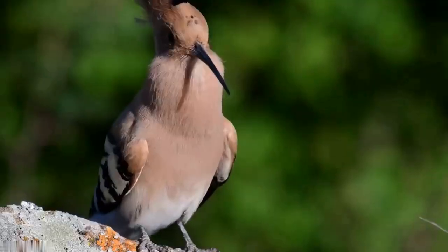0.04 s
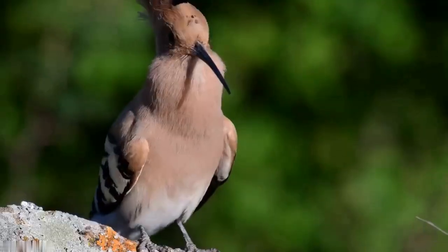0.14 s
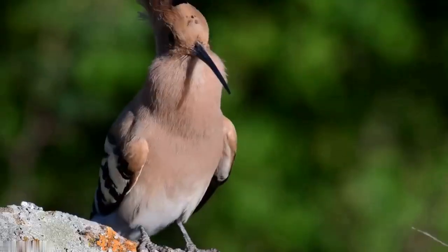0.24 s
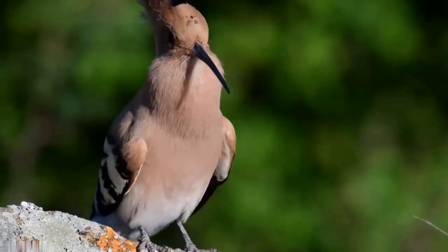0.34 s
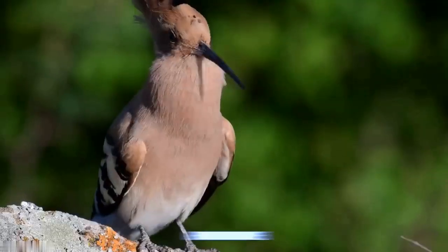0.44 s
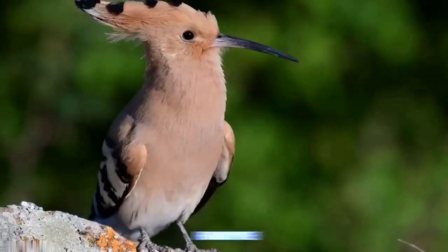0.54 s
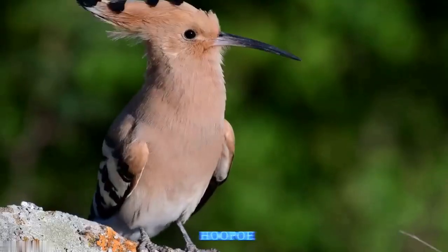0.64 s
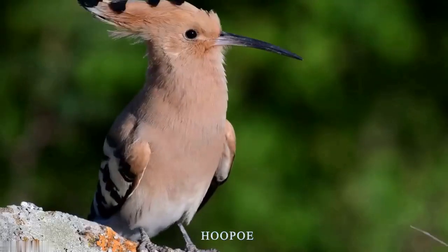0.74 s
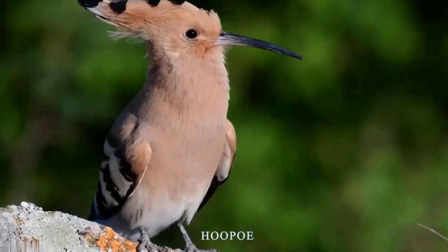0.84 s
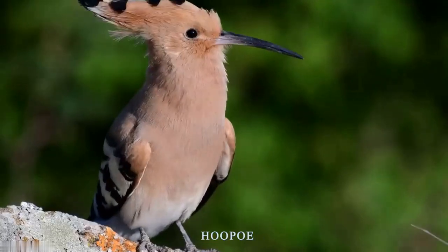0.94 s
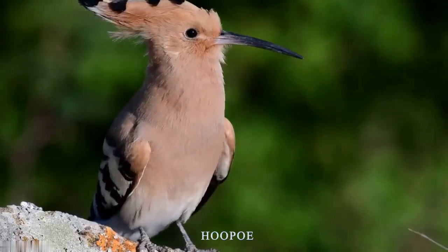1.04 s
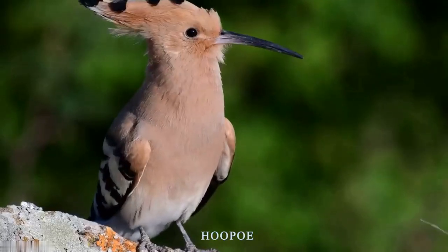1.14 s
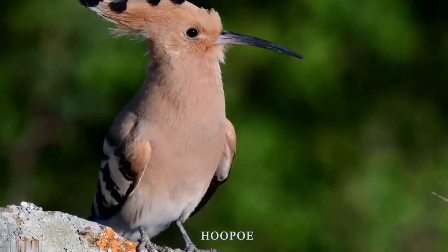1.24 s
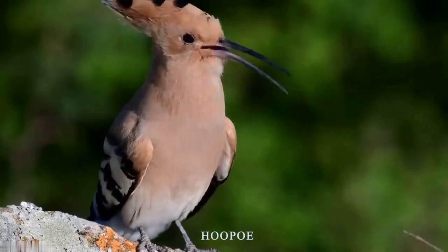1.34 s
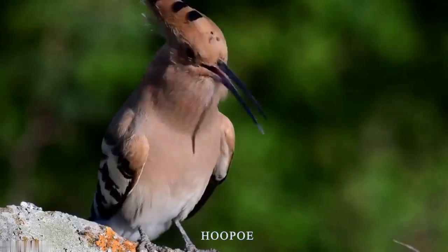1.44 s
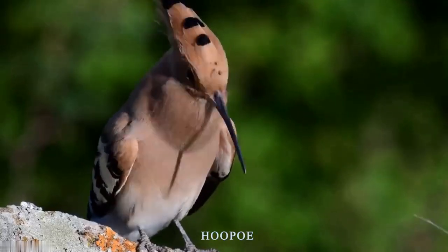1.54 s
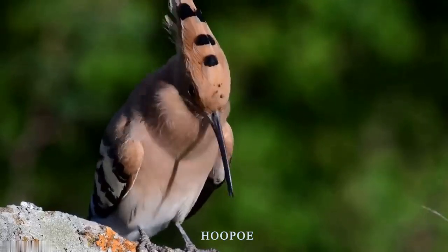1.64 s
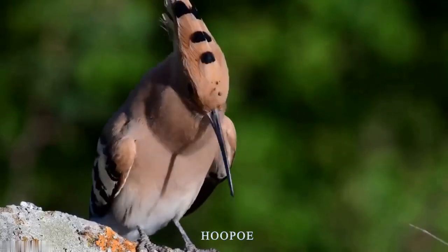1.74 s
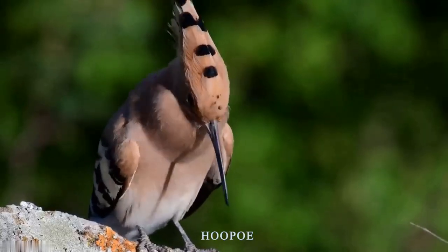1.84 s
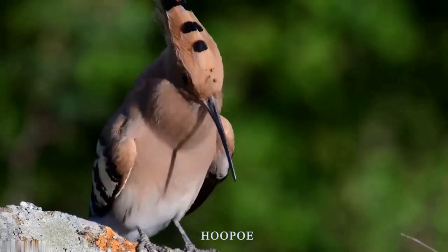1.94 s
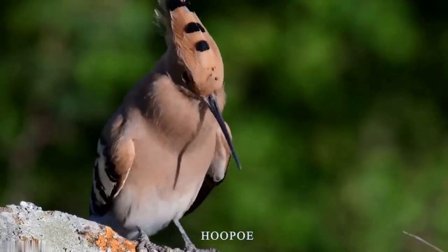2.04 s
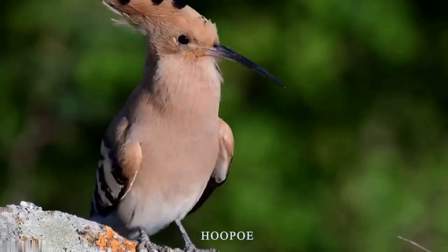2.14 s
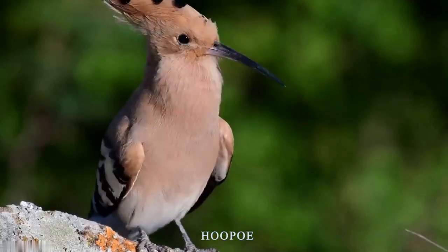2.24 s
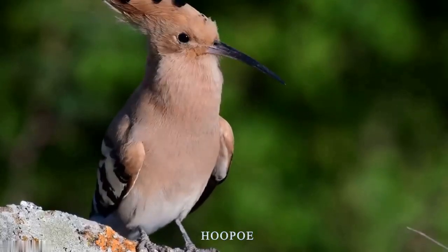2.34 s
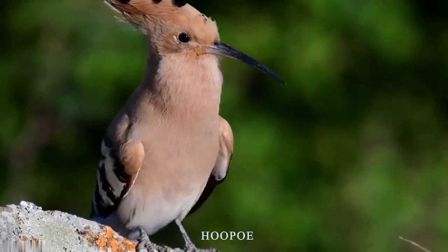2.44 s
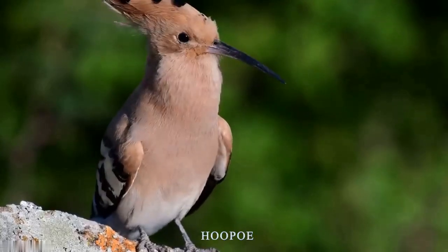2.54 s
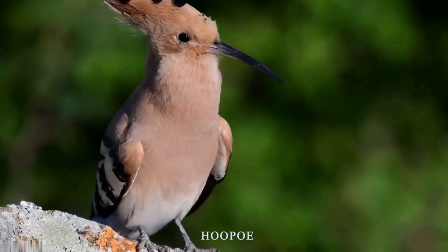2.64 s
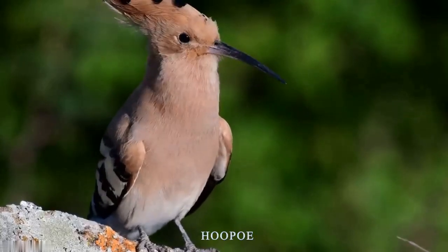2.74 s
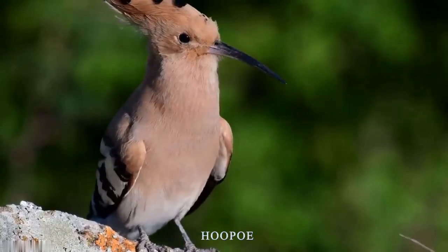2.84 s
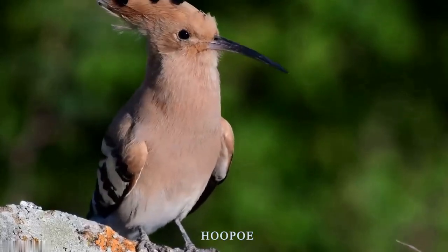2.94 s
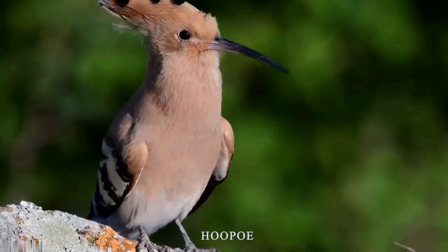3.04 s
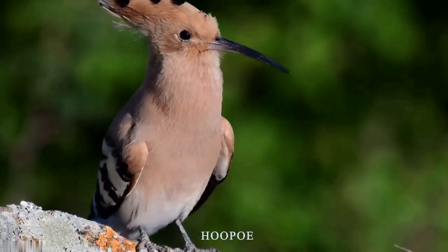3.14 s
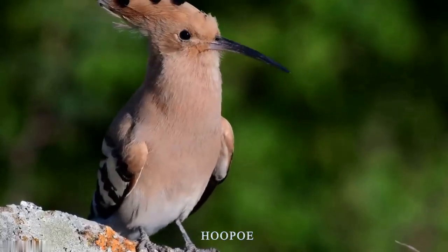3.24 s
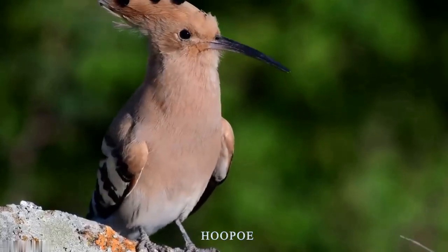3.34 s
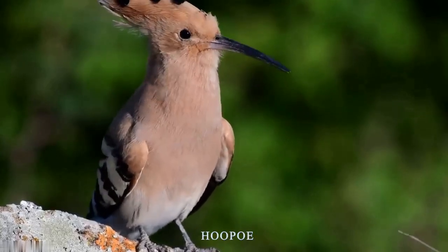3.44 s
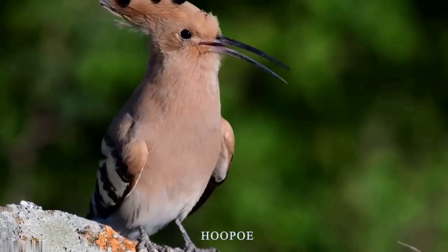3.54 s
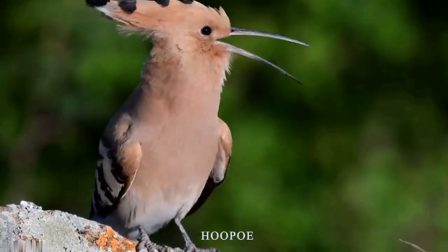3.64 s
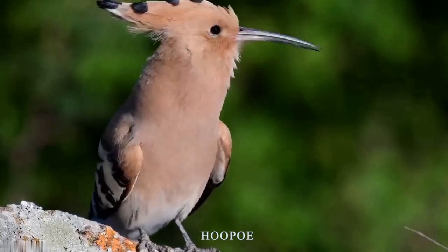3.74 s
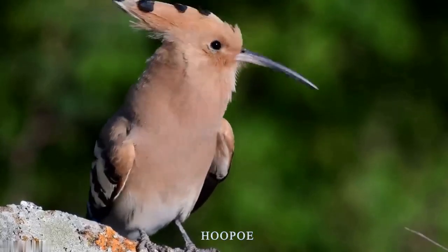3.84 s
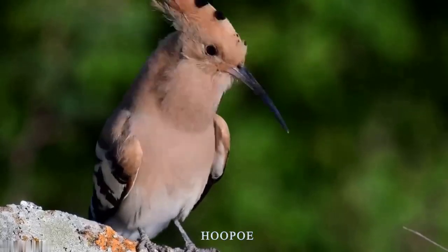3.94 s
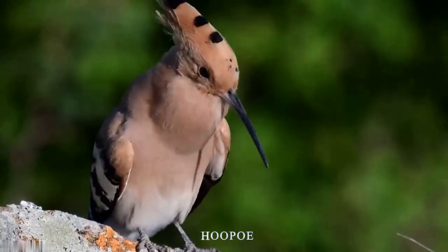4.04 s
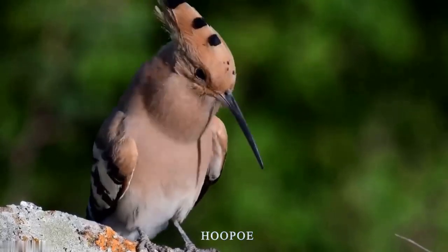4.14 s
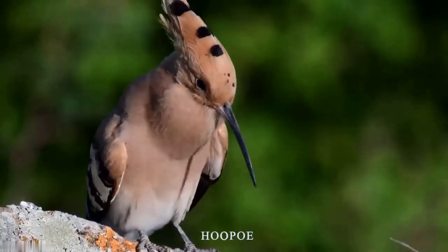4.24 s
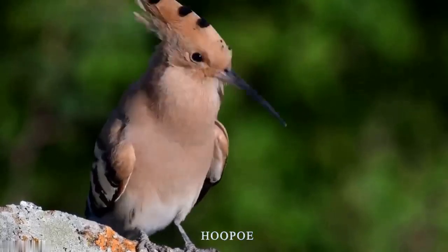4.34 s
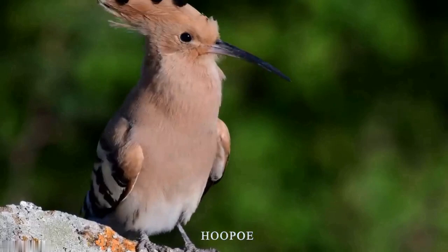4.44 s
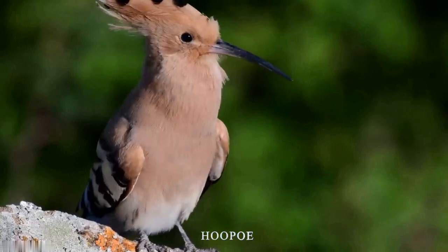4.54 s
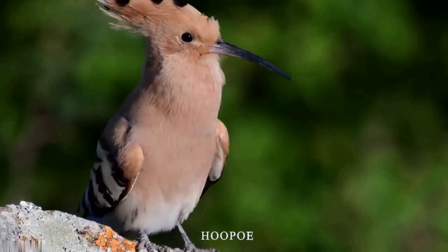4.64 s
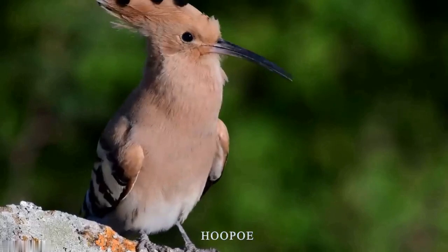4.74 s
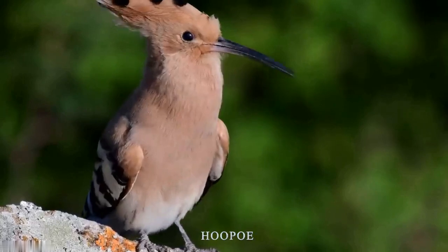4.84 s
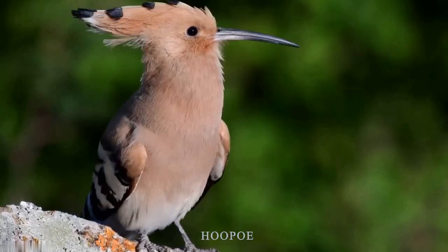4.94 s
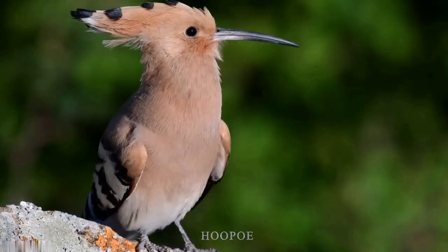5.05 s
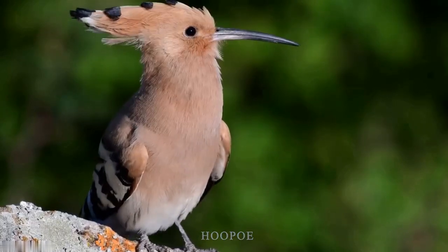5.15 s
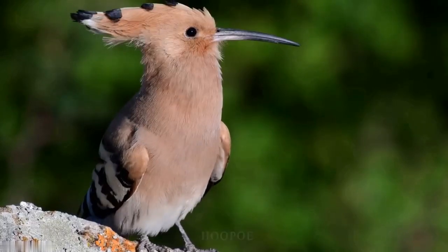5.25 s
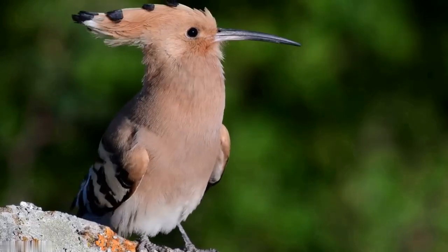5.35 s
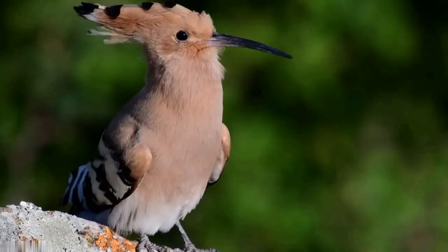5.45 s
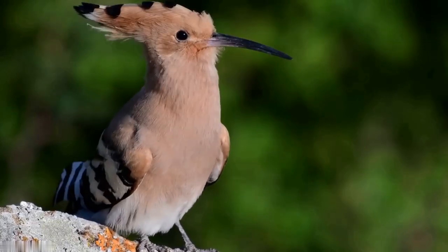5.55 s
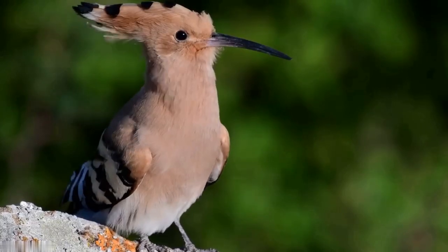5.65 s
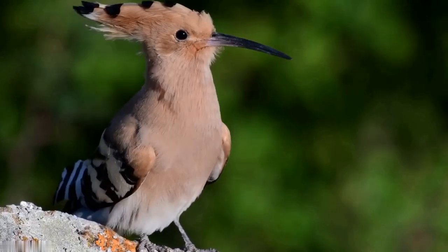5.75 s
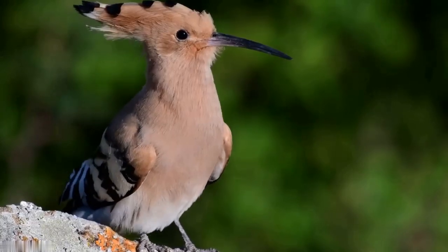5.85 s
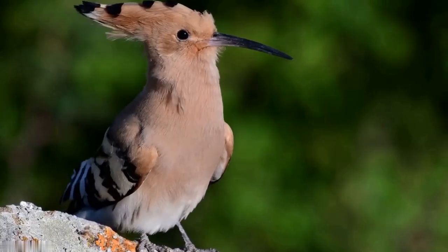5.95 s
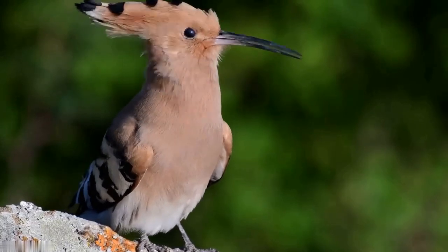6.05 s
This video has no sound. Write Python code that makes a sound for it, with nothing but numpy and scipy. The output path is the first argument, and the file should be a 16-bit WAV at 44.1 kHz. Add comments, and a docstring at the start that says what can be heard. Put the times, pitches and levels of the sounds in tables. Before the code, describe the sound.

Outdoors among rocks, grass and trees, the tail of one low hoot is followed by a pause, then a hoopoe's three even, pure, hollow notes. After another pause come three more, the first cracking briefly upward. Two crickets chirp thinly throughout, small birds tick and peep, and slight scuffs and rustles come before the second phrase. Wide stereo, leaning right, with little echo.

```python
"""Among rocks, grass and trees, a hoopoe hoots two soft phrases of three notes after the end of an earlier one.
Its notes are swelling near-sine tones with faint overtones; two crickets chirp in raspy wing strokes.
A small bird ticks in filtered noise, another peeps far away in arched whistles that flip upward.
Shaped noise makes rustles, swishes, scuffs and low bumps; the trees give a faint echo.
Under it lies a quiet, wide outdoor hush whose bass rises with one soft gust."""
import sys
import numpy as np
from scipy import signal
from scipy.fft import rfft, irfft
from scipy.io import wavfile
from scipy.ndimage import uniform_filter1d

SR = 44100
rng = np.random.default_rng(int(sys.argv[2]) if len(sys.argv) > 2 else 0)


def master_out(mix):
    """Clip the mix to full scale and print it as 16-bit PCM to the path in sys.argv[1]."""
    frames = np.transpose(np.atleast_2d(mix))
    ceiling = np.clip(frames, -1, 1)
    pcm = np.round(ceiling * 32767).astype(np.int16)
    wavfile.write(sys.argv[1], SR, pcm)


N = 268833


def amp(db):
    """Decibel law: 20 dB is a factor of ten in amplitude."""
    return 10 ** (np.asarray(db) / 20)


def unit(x):
    """Normalisation to a root-mean-square of 1."""
    return x / np.sqrt(np.mean(x ** 2) + 1e-20)


def read(points, hz):
    """Logarithmic frequency scale: joins (Hz, value) points along it."""
    f, value = np.transpose(points)
    return np.interp(np.log(hz + 1), np.log(f), value)


def add(mix, s, sound):
    """Superposition: adds a stereo sound, which may have begun before time zero."""
    start = round(s * SR)
    sound = sound[:, max(-start, 0):]
    part = mix[:, max(start, 0):][:, :sound.shape[1]]
    part += sound[:, :part.shape[1]]


def progress(length):
    """Normalised time: runs from 0 to 1 over length seconds."""
    return np.linspace(0, 1, max(round(length * SR), 16))


def wander(count, hz):
    """Low-pass noise: a smooth random drift of rms 1, no faster than about hz."""
    f = np.fft.rfftfreq(count + 4096, 1 / SR)
    spectrum = rfft(rng.standard_normal(count + 4096))
    return unit(irfft(spectrum * np.exp(-(f / hz) ** 2)))[:count]


def burst(length, colour):
    """Spectral shaping: noise of the given colour that swells and fades."""
    u = progress(length)
    spectrum = rfft(rng.standard_normal(16384))
    noise = irfft(spectrum * colour(np.fft.rfftfreq(16384, 1 / SR)))[:len(u)]
    return unit(noise) * np.sin(np.pi * u)


def hump(hz, width_hz):
    """Resonance: a broad peak with steep skirts."""
    return lambda f: 1 / (1 + ((f - hz) / width_hz) ** 4)


# Hoopoe notes; the fifth row's voice cracks into the two short tones after it.
# Each row: start in seconds, length in seconds, level in dB, then pitch in Hz early, in the middle, at the end.
HOOTS = [(-.1035, .113, -23, 650, 665, 670), (1.702, .111, -23.4, 672, 665, 637),
         (1.904, .113, -22.1, 661, 672, 669), (2.113, .113, -22.1, 648, 664, 679),
         (3.980, .081, -26.4, 668, 674, 692), (4.053, .015, -34, 790, 790, 765),
         (4.063, .021, -33.5, 735, 695, 625), (4.171, .115, -24, 649, 658, 640),
         (4.380, .112, -24.1, 644, 659, 658)]
# Overtones that leak past the swollen throat.
# Each row: multiple of the pitch, level in dB before the boost at closing.
OVERTONES = [(2, -40.5), (3, -51.5)]
# Slow swell and quick shut-off as shares of the note, the latter no faster than the syrinx can close.
HOOT_SWELL, HOOT_RELEASE, HOOT_SHUT_S = 0.37, 0.13, 0.0068


def hoot(s, length, db, early_hz, middle_hz, end_hz, scoop=.86, waver=0.002, closing_db=5, steepness=2.01):
    """Pressure-driven syrinx: an almost pure tone scoops up to pitch as the air pressure builds."""
    u = progress(length)
    hz = np.interp(u, [0, .25, .62, 1], [early_hz * scoop, early_hz, middle_hz, end_hz])
    wavering_hz = uniform_filter1d(hz, size=400) * (1 + waver * wander(len(u), 120))
    turns = np.cumsum(wavering_hz) / SR
    release = max(HOOT_RELEASE, HOOT_SHUT_S / length)
    opening = 1 - np.exp(-(u / HOOT_SWELL) ** steepness)
    closing = 1 - np.exp(-((1 - u) / release) ** 2)
    swell = opening * closing
    tone = swell * np.sin(2 * np.pi * turns)
    # overtones come up as soon as the syrinx vibrates, and are lifted as it closes
    edge = abs(swell) ** .5 * amp(closing_db * np.exp(-((u - .88) / 0.38) ** 2))
    for multiple, overtone_db in OVERTONES:
        level = amp(overtone_db + 1.9 * wander(len(u), 56)) * edge
        tone += level * np.sin(2 * np.pi * round(multiple) * turns)
    return s, amp(db) * tone


# Chirps of the near cricket.
# Each row: centre of the first wing stroke in seconds, level of a full stroke in dB.
NEAR_CHIRPS = [(.122, -52), (.411, -56), (.775, -49.5), (1.088, -56), (1.393, -54), (1.670, -53),
               (1.975, -55.5), (2.270, -52.5), (2.549, -49.5), (2.833, -49.5), (3.108, -46), (3.382, -46),
               (3.650, -52), (3.915, -48.5), (4.199, -52), (4.488, -57.5), (4.758, -56), (5.052, -46),
               (5.330, -48.5), (5.619, -48.5), (5.921, -49.5)]
# The gap from stroke to stroke grows within a chirp; the pitch falls by a share as the wing closes.
STROKE_GAP_S, GAP_GROWTH_S, STROKE_SAG = .027, .0045, .095
# The wings need a moment to reach full swing: full stroke length, then what the first stroke lacks
# (share of length, share of pitch, dB).
STROKE_S, FIRST_SHORTER, FIRST_LOWER, FIRST_SOFTER_DB = .029, 0.52, 0.021, 3.5


def cricket(chirps, hz, rasp, vary_db, grain_db, count=4, taper=1.1):
    """Stridulation: the scraper is dragged over the file, a short raspy tone that falls at its end."""
    for s, db in chirps:
        for k in range(count):
            lack = np.exp(-k)
            length = STROKE_S * (1 - FIRST_SHORTER * lack)
            u = progress(length)
            stroke_hz = hz * (1 - FIRST_LOWER * lack - STROKE_SAG * u ** 3)
            teeth_hz = stroke_hz * (1 + rasp * wander(len(u), 700))
            stroke_db = db - FIRST_SOFTER_DB * lack + vary_db * rng.standard_normal()
            swell = abs(np.sin(np.pi * u)) ** taper * amp(stroke_db)
            grip = amp(grain_db * wander(len(u), 370))
            yield s - length / 2, swell * grip * np.sin(2 * np.pi * np.cumsum(teeth_hz) / SR)
            s = s + STROKE_GAP_S + k * GAP_GROWTH_S


# Drifting loudness of the far cricket. Each row: time in seconds, level of a full stroke in dB.
FAR_LEVEL = [(.15, -61), (.5, -66.5), (2, -64.5), (3.1, -61.5), (3.9, -70.5), (4.9, -67), (5.3, -61)]
FAR_FIRST_S, FAR_PERIOD_S = -.063, .2518


def far_chirps(stray_s=0.0028):
    """Near-periodic rhythm: (s, dB) of the far cricket's chirps, each straying a little from the beat."""
    times = np.arange(FAR_FIRST_S, N / SR - FAR_PERIOD_S, FAR_PERIOD_S)
    strayed = times + stray_s * rng.standard_normal(len(times))
    return zip(strayed, np.interp(times, *np.transpose(FAR_LEVEL)))


# Dry ticks of a small bird.
# Each row: centre in seconds, length in seconds, level in dB, resonance in Hz.
TICKS = [(.683, 0.039, -63, 5040), (.881, 0.05, -57.5, 5400), (1.126, 0.019, -56.5, 5330),
         (1.891, 0.025, -55.5, 5886), (2.265, 0.029, -56, 5694), (3.611, 0.025, -53, 5400),
         (4.709, 0.022, -63, 5300), (5.040, 0.021, -55.5, 5080), (5.382, 0.036, -52.5, 5400)]
# Soft low bumps. Each row: centre in seconds, length in seconds, level in dB, resonance in Hz.
BUMPS = [(1.522, .024, -60.5, 300), (3.816, .016, -52.5, 150), (3.906, .022, -53.5, 160),
         (5.172, .03, -56, 335)]


def puffs(rows, width_hz, grain_db):
    """Resonance filtering: short grainy noises, each in one resonance."""
    for s, length, db, hz in rows:
        sound = burst(length, hump(hz, width_hz))
        grain = unit(amp(grain_db * wander(len(sound), width_hz / 2)))
        yield s - length / 2, amp(db) * sound * grain


# Peeps of a distant bird. Each row: start in seconds, level in dB.
PEEPS = [(.003, -49), (.664, -51.5), (1.382, -54), (2.522, -54.5), (3.606, -59.5), (5.478, -58.5)]
# Length, pitch at the top of the arch, share by which its ends lie lower.
PEEP_S, PEEP_HZ, PEEP_ARCH = .055, 1808, .1
# Past its middle the voice flips up: when, for how long, pitch ratio, level change.
FLIP_AT_S, FLIP_S, FLIP_RATIO, FLIP_DB = .033, .012, 1.2, -4


def peep(s, db, rough=0.011, vary=.008, hoarse_db=1.5):
    """Frequency modulation: a thin, slightly hoarse whistle arches and breaks upward for a moment."""
    u = progress(PEEP_S)
    flip = np.exp(-(2 * (u * PEEP_S - FLIP_AT_S) / FLIP_S) ** 8)
    hz = PEEP_HZ * (1 - PEEP_ARCH * (2 * u - 1) ** 2) * FLIP_RATIO ** flip
    level = amp(db + FLIP_DB * flip + hoarse_db * wander(len(u), 300))
    swell = level * abs(np.sin(np.pi * u)) ** .5
    pitch = hz * (1 + vary * rng.standard_normal() + rough * wander(len(u), 300))
    return s, swell * np.sin(2 * np.pi * np.cumsum(pitch) / SR)


# Scuffs and snaps close by. Each row: centre in seconds, length in seconds, level in dB.
SCUFFS = [(3.811, 0.004, -52.5), (3.895, 0.04, -59), (3.901, 0.015, -45), (4.876, 0.0076, -52.5)]
# Their spectrum. Each row: frequency in Hz, relative level in dB.
SCUFF_COLOUR = [(60, -4), (300, 9.5), (700, -5), (1050, -9), (1400, 3), (2200, -4.5), (4000, -5),
                (6800, 3.5), (8500, -13), (10500, -8.5), (13000, -25.5)]
# Dry rustles on the right. Each row: centre in seconds, length in seconds, level in dB.
RUSTLES = [(3.768, 0.028, -58), (3.793, 0.047, -63), (3.826, .018, -62), (3.973, .028, -67.5),
           (4.115, .05, -68), (4.21, 0.24, -75.5), (4.310, .022, -58.5), (4.352, .1, -65.5),
           (4.808, 0.031, -66.5)]
# Their spectrum. Each row: frequency in Hz, relative level in dB.
RUSTLE_COLOUR = [(900, -21.5), (1550, -11.5), (1850, 4), (2100, -2.5), (2450, -7.5), (3200, -15.5),
                 (4200, -17.5), (8000, -33)]
# Faint high swishes. Each row: centre in seconds, length in seconds, level in dB.
SWISHES = [(.145, 0.057, -62), (.26, .35, -72), (.46, 0.043, -68), (.515, 0.036, -66), (.81, 0.078, -65),
           (3.78, .089, -66.5), (3.925, 0.046, -65)]
# Their spectrum. Each row: frequency in Hz, relative level in dB.
SWISH_COLOUR = [(2000, -22.5), (4000, -9.5), (6000, -0.5), (9000, -3), (11000, -8), (14000, -32)]


def scrapes(rows, colour, grain_hz, grain_db):
    """Amplitude-modulated noise: brief, broad, grainy sounds of one colour."""
    for s, length, db in rows:
        sound = burst(length, lambda f: amp(read(colour, f)))
        grain = unit(amp(grain_db * wander(len(sound), grain_hz)))
        yield s - length / 2, amp(db) * sound * grain


# Decay of the diffuse echo. Each row: frequency in Hz, time to fall by 60 dB in seconds.
ECHO_T60 = [(300, 0.47), (700, 0.56), (2000, 0.98), (6000, 0.32), (12000, 0.13)]
# Single echoes from nearby trees. Each row: delay in seconds, level in dB against the diffuse echo.
REFLECTIONS = [(.043, -0.5), (.135, -12)]


def path(right_db, echo_db, scatter_db, scatter_s, lag_samples=0.):
    """Impulse response to two microphones: direct sound, scatter off ground and leaves, thin tree echoes."""
    size = 30000
    taps = rng.choice([-1., 1.], (2, size)) * (rng.random((2, size)) < 2000 / SR)  # about 2000 a second
    hz, t, z = signal.stft(taps, SR, nperseg=256)
    decay = amp(-60 * t / read(ECHO_T60, hz)[:, None])
    tail = signal.istft(z * decay, SR, nperseg=256)[1][:, :size]
    t = np.arange(size) / SR
    tail = tail * np.clip(t / 0.0093, 0, 1) ** 2
    scatter = rng.standard_normal((2, size)) * np.exp(-t / scatter_s)
    scatter, tail = (x / np.linalg.norm(x, axis=1, keepdims=True) for x in (scatter, tail))
    for delay, db in REFLECTIONS:
        tail[:, round(delay * SR)] += amp(db)
    # the left microphone hears the direct sound lag_samples later than the right
    lags = np.array([[lag_samples], [0]])
    direct = np.sinc(np.arange(size) - 16 - lags) * (np.arange(size) < 48)
    sides = amp(np.array([[-right_db], [right_db]]) / 2)
    return sides * (direct + amp(scatter_db) * scatter) + amp(echo_db) * tail


def place(sounds, way):
    """Convolution: sends (s, sound) pairs along one path."""
    mix = np.zeros((2, N))
    for s, sound in sounds:
        add(mix, s, signal.fftconvolve(sound[None], way, axes=1))
    return mix


# Spectrum of still air and hiss. Each row: frequency in Hz, relative level in dB per Hz.
AIR = [(20, -19.5), (50, 0), (100, -2.5), (200, -6), (400, -9), (800, -13), (1400, -17), (2200, -20.5),
       (3500, -21), (6000, -21.5), (9000, -24.5), (15500, -27)]
# Correlation of the two channels. Each row: frequency in Hz, left-right likeness (1 is identical).
LIKENESS = [(30, 0.53), (70, 0.9), (180, 0.49), (400, 0.25), (1500, 0.047), (3500, 0.062), (6000, 0.26),
            (9000, 1), (14000, 0.98)]
AIR_DB = -60.5  # rms level
# One soft gust lifts the bass: time of its top, half length, height.
GUST_AT_S, GUST_S, GUST_DB = 5.1, 0.73, 5


def air(wind_hz=100, lumpy_db=1.0, patchy_db=1.06):
    """Partly coherent noise: a wide outdoor hush whose bass follows the light wind."""
    frames, hz = N // 512 + 5, np.fft.rfftfreq(2048, 1 / SR)
    a, b, c, d, patches = rng.standard_normal((frames, 1025, 5)).T
    patches = uniform_filter1d(patches, size=30, axis=0)  # over frequency
    patches = unit(uniform_filter1d(patches, size=10, axis=1))  # over time
    t = np.arange(frames) * 512 / SR
    lumps = unit(uniform_filter1d(rng.standard_normal(frames), size=20))
    wind_db = GUST_DB * np.exp(-((t - GUST_AT_S) / GUST_S) ** 2) + lumpy_db * lumps
    gust_db = (wind_db - wind_db.mean()) / (1 + (hz[:, None] / wind_hz) ** 2)
    same = np.clip(read(LIKENESS, hz), -1, 1)[:, None]
    left = a + 1j * b
    right = same * left + np.sqrt(1 - same ** 2) * (c + 1j * d)
    z = np.array([left, right]) * amp(read(AIR, hz)[:, None] + gust_db + patchy_db * patches)
    return amp(AIR_DB) * unit(signal.istft(z, nperseg=2048, noverlap=1536)[1][:, :N])


def scene():
    """Superposition: each source reaches the listener by a path that favours the right, over the wide air."""
    rock = path(right_db=2.9, echo_db=-32.5, scatter_db=-39, scatter_s=.02)
    near_grass = path(right_db=6, echo_db=-27, scatter_db=-19, scatter_s=.006, lag_samples=-1.4)
    far_grass = path(right_db=5, echo_db=-19, scatter_db=-13, scatter_s=.006, lag_samples=-1)
    bushes = path(right_db=5.2, echo_db=-12, scatter_db=-8, scatter_s=.003)
    far_trees = path(right_db=2.7, echo_db=-22, scatter_db=-17, scatter_s=.003, lag_samples=7)
    close_by = path(right_db=4, echo_db=-18, scatter_db=-4, scatter_s=.0007)
    far_right = path(right_db=21, echo_db=-10, scatter_db=-20.5, scatter_s=.004)
    ahead = path(right_db=2, echo_db=-8.5, scatter_db=-3.5, scatter_s=0.0041)
    mix = place([hoot(*row) for row in HOOTS], rock)
    mix += place(cricket(NEAR_CHIRPS, hz=4815, rasp=.005, vary_db=.5, grain_db=.9), near_grass)
    mix += place(cricket(far_chirps(), hz=4582, rasp=.005, vary_db=2.5, grain_db=2.14), far_grass)
    mix += place(puffs(TICKS, width_hz=860, grain_db=1.0), bushes)
    mix += place(puffs(BUMPS, width_hz=95, grain_db=2.5), near_grass)
    mix += place([peep(*row) for row in PEEPS], far_trees)
    mix += place(scrapes(SCUFFS, SCUFF_COLOUR, grain_hz=600, grain_db=3.8), close_by)
    mix += place(scrapes(RUSTLES, RUSTLE_COLOUR, grain_hz=145, grain_db=2.0), far_right)
    mix += place(scrapes(SWISHES, SWISH_COLOUR, grain_hz=1350, grain_db=4), ahead)
    mix += air()
    return mix


# Two narrow bands that are filtered out. Each row: centre in Hz, half width in Hz.
NOTCHES = [(2620, 151), (7700, 286)]
EDGE_HZ = 15780  # upper band limit


def record(dry):
    """Linear filtering: two notches, then a steep low-pass."""
    f = np.fft.rfftfreq(N, 1 / SR)
    notches = [abs(f - hz) / np.hypot(f - hz, width) for hz, width in NOTCHES]
    gain = np.prod(notches, axis=0) ** 2
    notched = irfft(rfft(dry) * gain, N)
    low_pass = signal.firwin(1023, EDGE_HZ, window=("kaiser", 9), fs=SR)
    return signal.oaconvolve(notched, low_pass[None], "same")


dry = scene()
out = record(dry)
master_out(out)
```